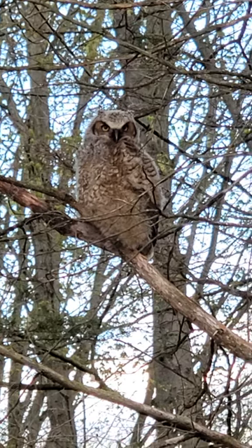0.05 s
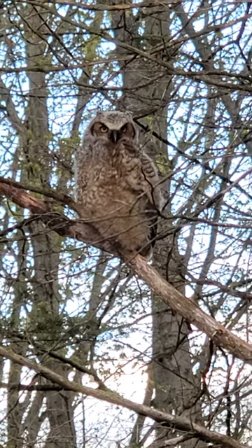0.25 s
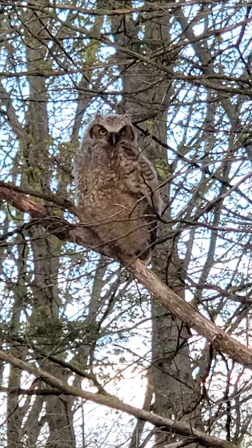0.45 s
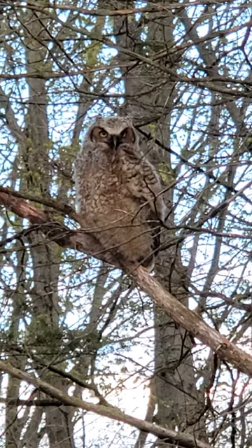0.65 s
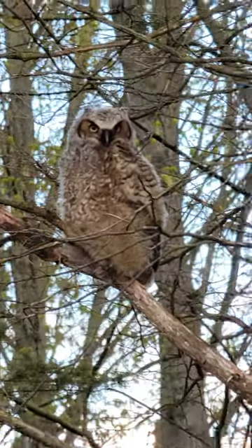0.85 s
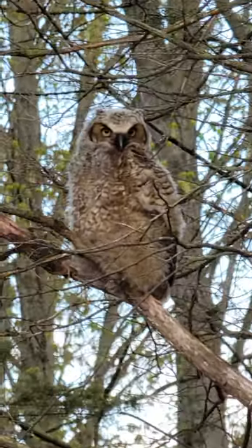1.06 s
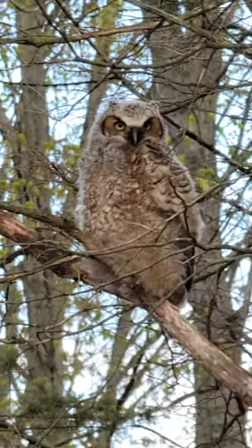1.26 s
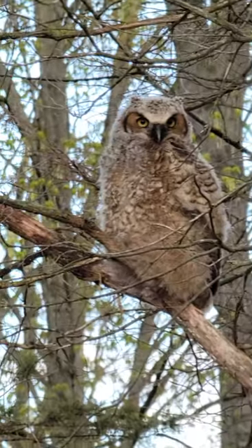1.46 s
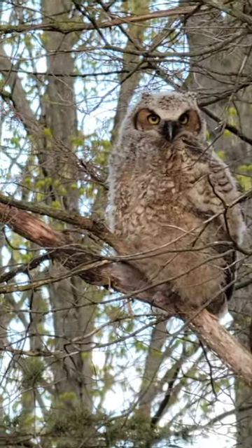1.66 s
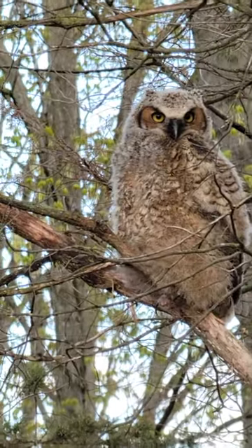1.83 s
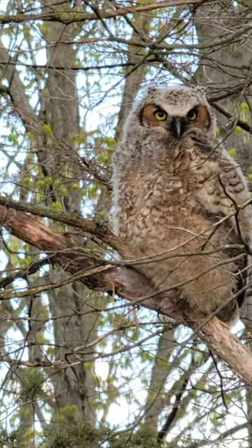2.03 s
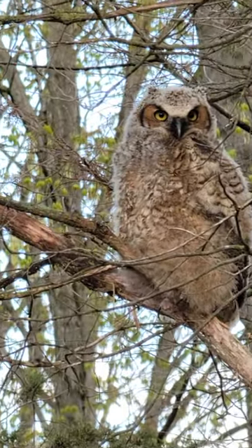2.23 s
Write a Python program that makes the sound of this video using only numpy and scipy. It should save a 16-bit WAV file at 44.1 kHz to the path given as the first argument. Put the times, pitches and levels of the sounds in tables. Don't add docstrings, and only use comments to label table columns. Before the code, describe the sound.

Outdoors among trees, light handling ticks and faint bird notes lead to a single raspy owlet screech under half a second long; then soft leaf rustle, more taps, and a quick bird twitter over low traffic rumble.

```python
import sys
import numpy as np
from scipy import signal
from scipy.fft import rfft, irfft
from scipy.io import wavfile
from scipy.ndimage import uniform_filter1d

SR = 44100
rng = np.random.default_rng(int(sys.argv[2]) if len(sys.argv) > 2 else 0)


def waveform_to_disk(signal):
    frames = np.transpose(np.atleast_2d(signal))
    scaled = np.clip(frames, -1, 1) * 32767
    samples = np.round(scaled).astype(np.int16)
    wavfile.write(sys.argv[1], SR, samples)


def ratio(d):
    e = np.asarray(d, float) / 20
    return 10 ** e


N = 101165
TIME_S = np.arange(N) / SR
HZ = np.fft.rfftfreq(N, 1 / SR)
EDGE_HZ = 15830
LEFT_LAG_S = -7e-5


def evened(x):
    return x / np.sqrt(np.mean(x ** 2) + 1e-20)


def read(points, hz):
    f, value = np.transpose(points)
    return np.interp(np.log(hz + 1), np.log(f + 1), value)


def along(rows, t):
    times, *columns = np.transpose(rows)
    return [np.interp(t, times, column) for column in columns]


def add(mix, s, sound):
    at = round(s * SR)
    sound = sound[..., max(-at, 0):]
    part = mix[..., max(at, 0):][..., :sound.shape[-1]]
    part += sound[..., :part.shape[-1]]


def drift(size, seconds):
    taps = np.hanning(256) * np.exp(-(np.arange(-128, 128) / (seconds * SR)) ** 2)
    return evened(signal.oaconvolve(rng.standard_normal(size), taps, "same"))


def ports(x, pan_db, lag_s):
    left = ratio(pan_db / 2) * np.exp(-2j * np.pi * HZ * lag_s)
    right = ratio(-pan_db / 2)
    return irfft(rfft(x, N) * np.array([left, right]), N)


def scatter(x, t60, start):
    taps = np.zeros((2, SR))
    at = np.arange(start, SR - 20, 20)
    at = at + rng.integers(0, 20, (2, len(at)))
    np.put_along_axis(taps, at, rng.choice([-1., 1.], at.shape), 1)
    taps *= ratio(-60 * np.arange(SR) / SR / t60)
    return signal.fftconvolve(x, taps / np.linalg.norm(taps[0]), axes=1)[:, :N]


# (start_s, pitch_hz, hum_level_db)
LOW_VOICE = [
    (.7, 945, -76),
    (.74, 960, -66),
    (.762, 955, -55),
    (.835, 942, -54.5),
    (.885, 936, -63),
    (.91, 935, -74),
]


def low_hum(low_hz, hum_db):
    turns = np.cumsum(low_hz + 6 * drift(N, 0.0033)) / SR
    hum = np.sqrt(2) * ratio(hum_db) * np.sin(2 * np.pi * turns)
    since_start, until_end = TIME_S - LOW_VOICE[0][0], LOW_VOICE[-1][0] - TIME_S
    return hum * np.clip(np.minimum(since_start, until_end) / 0.022, 0, 1)


# (start_s, pitch_hz, wobble_hz, rasp_share from 0 to 1)
HIGH_VOICE = [
    (.5, 3500, 300, .8),
    (.6, 3550, 250, .7),
    (.64, 3750, 220, .7),
    (.7, 3605, 190, .68),
    (.86, 3500, 200, .72),
    (.885, 3300, 140, .5),
    (.901, 2850, 80, .4),
    (.913, 2400, 60, .3),
    (.935, 2000, 60, .1),
]


def whistle(low_turns):
    high_hz, wobble_hz, rasp_share = along(HIGH_VOICE, TIME_S)
    high = 2 * np.pi * np.cumsum(high_hz + wobble_hz * drift(N, .001)) / SR
    low = 2 * np.pi * low_turns
    tone = np.cos(high) + ratio(-5) * np.cos(2 * high)
    tone += ratio(-12) * np.cos(high + low) + ratio(-24) * np.cos(high - low)
    tone = irfft(rfft(tone) / (1 + (HZ / 5900) ** 16), N)
    return evened(tone), np.clip(rasp_share, 0, 1)


# (pitch_hz, level_db per Hz)
BEAK = [(760, -56), (1300, -34.5), (2620, -19), (2960, -12), (3650, -5.5), (5800, -19.5), (6210, -32.5),
        (8970, -40), (10500, -84), (13600, -95), (22000, -120)]
# (pitch_hz, width_hz, lift_db)
THROAT = [(1900, 400, 5), (3050, 400, 5), (3600, 450, 5), (4300, 500, 2), (5170, 400, 9), (5750, 300, 2),
          (7300, 600, 4), (8800, 600, 4)]


def rasp(low_turns, effort_db):
    pulses = sum(np.cos(2 * np.pi * k * low_turns) for k in range(2, 11))
    puffs = np.exp(-(low_turns % 1) / .35) * rng.standard_normal(N)
    lift_db = sum(db / (1 + (2 * (HZ - f) / width) ** 2) for f, width, db in THROAT)
    colour = ratio(read(BEAK, HZ) + lift_db)
    raw = rfft(evened(puffs) + ratio(-15) * evened(pulses)) * colour * (HZ > 1250)
    core = np.exp(-(2 * (HZ - 3450) / 1700) ** 4) + np.exp(-(2 * (HZ - 5650) / 500) ** 4)
    wings = ratio(np.minimum(.35 * (effort_db + 36), 0))
    rough = (irfft(raw * core, N) + wings * irfft(raw * (1 - core), N)) / np.std(irfft(raw, N))
    throb_db = .6 * drift(N, .0012)
    return rough * ratio(throb_db)


# (start_s, level_db)
EFFORT = [
    (.5, -78),
    (.522, -59),
    (.585, -58.5),
    (.64, -47),
    (.688, -36),
    (.8, -33),
    (.895, -36),
    (.927, -48),
    (.94, -76),
]
# (pitch_hz, left_minus_right_db)
OWL_PAN = [(950, 12.5), (1800, -2.5), (3000, 4), (4000, 1), (5500, 1.5), (6500, -11), (9000, -4.5)]


def owl():
    effort_db = along(EFFORT, TIME_S)[0]
    low_hz, hum_db = along(LOW_VOICE, TIME_S)
    low_turns = np.cumsum(low_hz * (1 + .03 * drift(N, .002))) / SR
    clear, rasp_share = whistle(low_turns)
    rough = rasp(low_turns, effort_db)
    flutter_db = .8 * drift(N, .003)
    voice = np.sqrt(rasp_share) * rough + np.sqrt(1 - rasp_share) * clear * ratio(flutter_db)
    beat = np.cumsum(.35 * low_hz * (1 + .07 * drift(N, .003))) / SR
    voice = voice * ratio(3 * np.cos(2 * np.pi * beat))
    opening = np.clip((TIME_S - EFFORT[0][0]) / 0.013, 0, 1)
    closing = np.clip((EFFORT[-1][0] - TIME_S) / 0.0069, 0, 1)
    pan_db = read(OWL_PAN, HZ)
    cry = ports(ratio(effort_db) * opening * closing * voice, pan_db, LEFT_LAG_S)
    hum = ports(low_hum(low_hz, hum_db), pan_db, LEFT_LAG_S)
    twigs = ratio(-3) * scatter(cry, t60=.04, start=10)
    wood = ratio(-16) * scatter(cry + hum, t60=.5, start=800)
    return cry + hum + twigs + wood


# (start_s, length_s, first_hz, last_hz, level_db)
BIRDS = [(-.03, .061, 4200, 4170, -62), (.036, .05, 4190, 4110, -61), (.085, .06, 4120, 4020, -80),
         (.28, .075, 5200, 4300, -79), (.345, .04, 4250, 4050, -72), (.466, .055, 3550, 3510, -65),
         (.51, .11, 2740, 2480, -70), (1.305, .06, 3480, 3300, -78), (1.37, .04, 3350, 3480, -79),
         (1.448, .055, 2490, 2590, -67), (1.568, .042, 4110, 4200, -63), (1.97, .07, 2900, 2950, -79),
         (1.97, .06, 2050, 2080, -79), (2.08, .035, 2850, 2800, -74), (2.135, .035, 3050, 2800, -70),
         (2.15, .04, 2650, 2500, -67), (2.195, .032, 2550, 2400, -71), (2.228, .016, 5950, 5800, -76),
         (2.238, .024, 5750, 4500, -63), (2.252, .022, 4750, 2950, -62), (2.263, .02, 4900, 2900, -64),
         (2.273, .02, 4700, 3000, -66), (2.257, .022, 5400, 3900, -68), (2.268, .025, 5400, 4000, -68),
         (2.25, .05, 4700, 4750, -69), (2.275, .025, 3150, 3000, -71)]


def birds():
    mix = np.zeros(N)
    for start, length, first_hz, last_hz, db in BIRDS:
        u = np.arange(0, length, 1 / SR) / length
        glide = (u + .5 - .5 * np.cos(np.pi * u)) / 2
        turns = np.cumsum(first_hz + (last_hz - first_hz) * glide) / SR
        edge = np.clip(np.minimum(u, 1 - u) * length / 0.0062, 0, 1)
        add(mix, start, np.sqrt(2) * ratio(db - 2) * edge * np.sin(2 * np.pi * turns))
    unsteady = mix * ratio(1.5 * drift(N, .002))
    direct = ports(unsteady, np.full(len(HZ), .8), -3e-5)
    return direct + ratio(-1) * scatter(direct, t60=.22, start=300)


# (start_s, tick_db, tick_hz, thump_db, left_minus_right_db)
TICKS = [(.0105, -56, 9500, -70, 0), (.0335, -45, 6300, -45, 8), (.0338, -43, 1500, -60, 8),
         (.129, -58, 8500, -70, 0), (.142, -60, 5000, -70, 0), (.153, -62, 6500, -70, 0),
         (.1222, -33, 1500, -40, -18), (.352, -58, 4000, -60, 0), (1.672, -55, 7500, -65, 0),
         (1.8515, -37, 800, -52, -22), (1.908, -42, 300, -45, -18)]


def ticks():
    mix, t = np.zeros((2, N)), np.arange(3000) / SR
    cycles = .7
    thump_hz = 657 * (0.26 + (1 - 0.26) * np.exp(-t / .004))
    thump = np.sin(2 * np.pi * np.cumsum(thump_hz) / SR)
    thump *= np.minimum(t / .002, 1) * np.exp(-t / .008)
    for s, tick_db, tick_hz, thump_db, pan_db in TICKS:
        u = t * tick_hz / cycles
        snap = -np.exp(-(2 * u - 2) ** 2) * np.cos(2 * np.pi * (tick_hz * t - cycles))
        sides = ratio(np.minimum([[pan_db], [-pan_db]], 0))
        tick = sides * ratio(tick_db) * snap + sides ** .7 * ratio(thump_db) * thump
        add(mix, s - cycles / tick_hz, tick)
    return mix


# (start_s, length_s, rise_share from 0 to 1)
RUSTLE_TIMES = [
    (1.0, .17, .08),
    (.12, .05, .1),
    (1.45, .75, .45),
]
# (centre_hz, width_hz, level_db)
RUSTLE_SOUNDS = [
    (8230, 4000, -70.5),
    (7000, 12000, -67.5),
    (6000, 9900, -69),
]


def rustles():
    mix = np.zeros((2, N))
    for (s, length, rise), (centre_hz, width, db) in zip(RUSTLE_TIMES, RUSTLE_SOUNDS):
        u = np.arange(0, length, 1 / SR) / length
        grains = rng.standard_normal((2, SR))[:, :len(u)]
        grains = grains * ratio(drift(SR, 0.0012)[:len(u)])
        hz = np.fft.rfftfreq(len(u), 1 / SR)
        hiss = irfft(rfft(grains) * np.exp(-(2 * (hz - centre_hz) / width) ** 2), len(u))
        add(mix, s, ratio(db) * evened(hiss) * np.minimum(u / rise, 1) * (1 - u) ** 0.51)
    return mix


# (pitch_hz, likeness, 1 = identical)
SAME = [(40, .9), (130, .62), (300, .5), (700, .97), (1600, .6), (5000, 0), (15000, 0)]
# (pitch_hz, left_minus_right_db)
PAN = [(60, -2), (240, 0.5), (950, -2.5), (3770, 2.5), (15000, 4)]


def bed(shape, size, patchy_db):
    frames, hz = 4 * N // size + 5, np.fft.rfftfreq(size, 1 / SR)
    a, b, c, d, patches = rng.standard_normal((frames, size // 2 + 1, 5)).T
    patches = uniform_filter1d(patches, size=10, axis=0)
    patches = evened(uniform_filter1d(patches, size=12, axis=1))
    same = np.clip(read(SAME, hz), -1, 1)[:, None]
    left = a + 1j * b
    right = same * left + np.sqrt(1 - same ** 2) * (c + 1j * d)
    lag = np.exp(-2j * np.pi * hz * LEFT_LAG_S + .3j)[:, None]
    z = np.array([left * lag, right])
    inside = (hz >= shape[0][0]) & (hz < EDGE_HZ)
    z *= ratio(read(shape, hz)[:, None] + patchy_db * patches) * inside[:, None]
    z *= ratio(np.array([[.5], [-.5]]) * read(PAN, hz))[:, :, None]
    x = signal.istft(z, nperseg=size, noverlap=size * 3 // 4)[1][:, :N]
    return x / np.sqrt(np.mean(x.mean(0) ** 2))


# (start_s, level_db)
DRONE = [(0, -58.5), (.13, -46.5), (.24, -59.5), (.38, -52), (.45, -64.5), (.6, -53), (.7, -55.5),
         (.95, -60.5), (1.06, -59), (1.12, -55), (1.25, -56), (1.6, -55.5), (1.8, -59), (1.93, -55),
         (2.0, -61), (2.15, -59), (2.29, -57)]
# (pitch_hz, level_db per Hz)
RUMBLE = [(15, -35), (27, -22.5), (42, -2.5), (62, 3.5), (97, -1), (125, -13.5), (150, -18.5), (250, -98)]
ROAD = [(150, -5.5), (420, -9), (520, -1.5), (660, -8), (970, -2), (1170, -5), (1450, -15), (2100, -39.5),
        (3000, -101)]
AIR = [(940, -75), (1600, 4), (2300, -1), (3160, -2), (3370, -6), (3710, -4), (8950, -11.5), (11000, -19),
       (15700, -7)]


def background():
    rumble = ratio(along(DRONE, TIME_S)[0]) * bed(RUMBLE, size=4096, patchy_db=-0.45)
    road = ratio(-63.5) * bed(ROAD, size=1024, patchy_db=2.02)
    air = ratio(-73) * bed(AIR, size=512, patchy_db=1.2)
    return rumble + road + air


def scene():
    return background() + owl() + birds() + ticks() + rustles()


def top_cut(x):
    return signal.sosfilt(signal.butter(12, 15890, fs=SR, output="sos"), x)


def record(dry):
    mix = irfft(rfft(dry) * (HZ < EDGE_HZ), N)
    return top_cut(mix)


dry = scene()
out = record(dry)
waveform_to_disk(out)
```